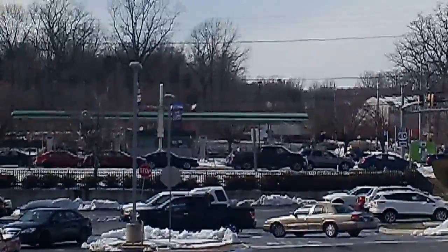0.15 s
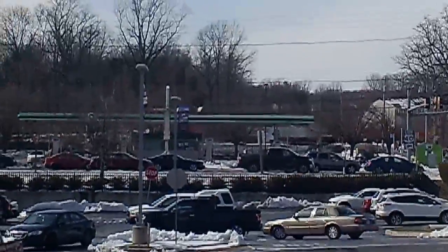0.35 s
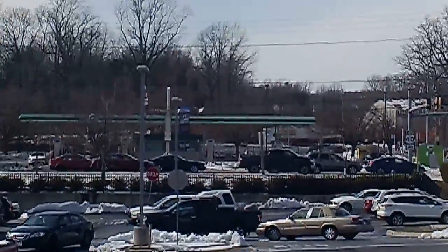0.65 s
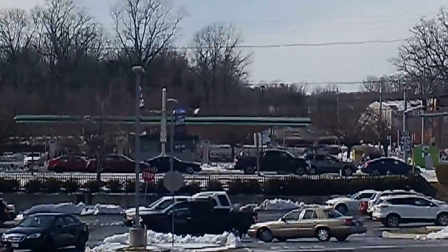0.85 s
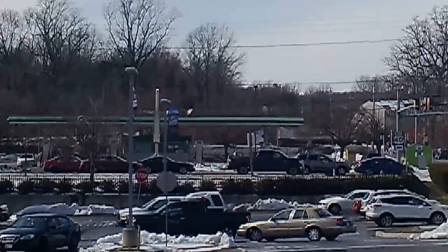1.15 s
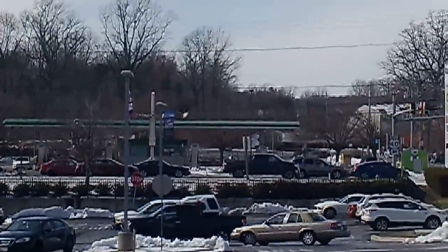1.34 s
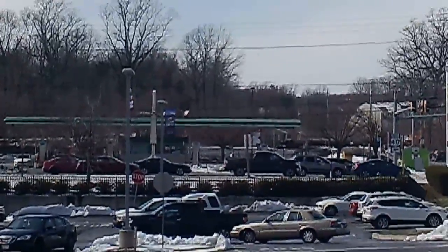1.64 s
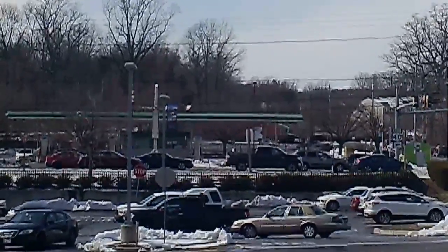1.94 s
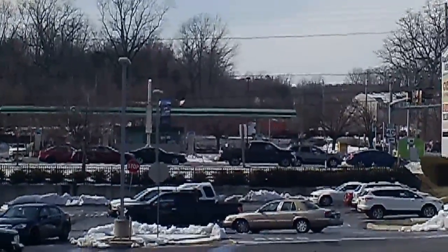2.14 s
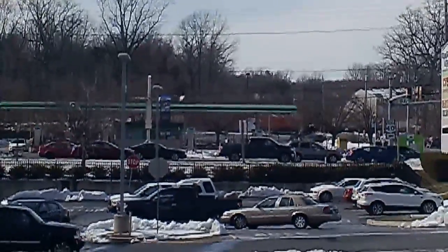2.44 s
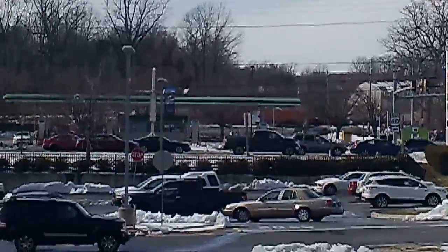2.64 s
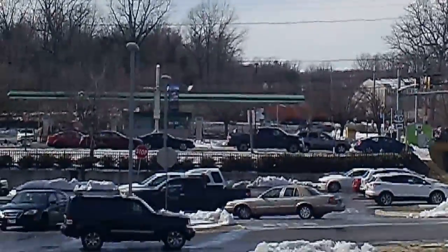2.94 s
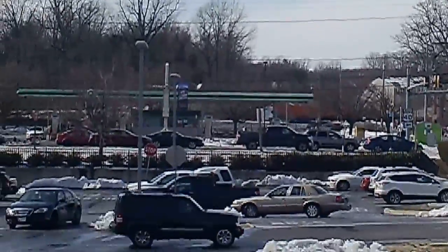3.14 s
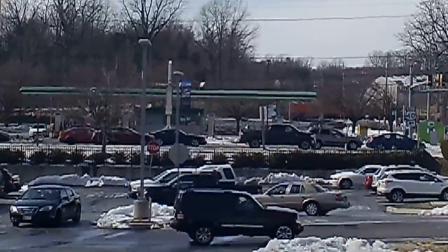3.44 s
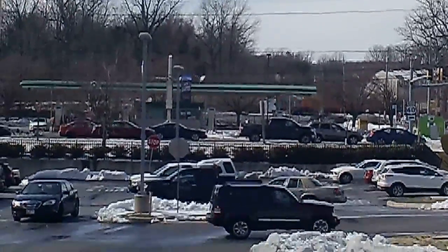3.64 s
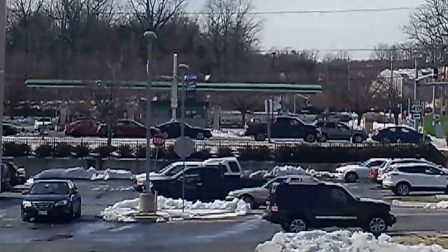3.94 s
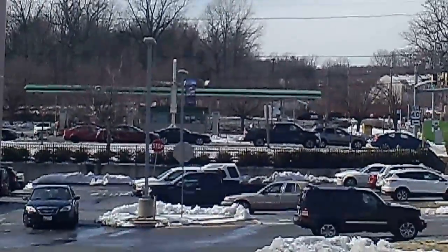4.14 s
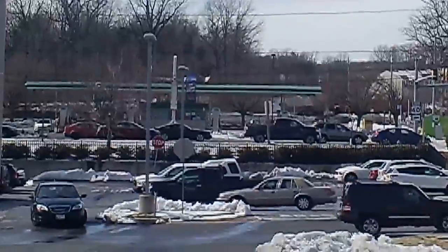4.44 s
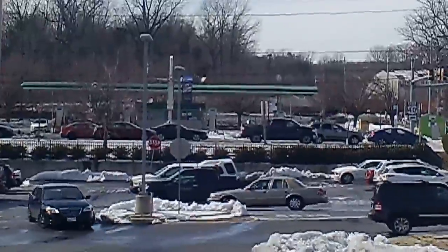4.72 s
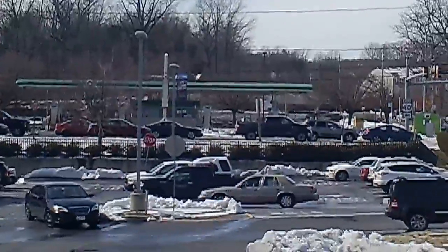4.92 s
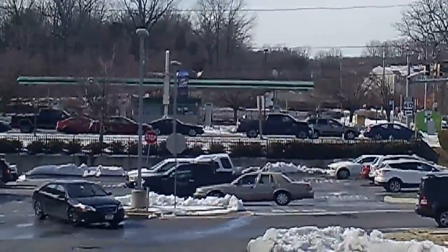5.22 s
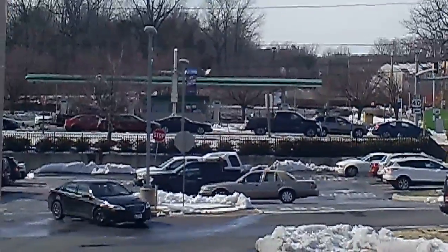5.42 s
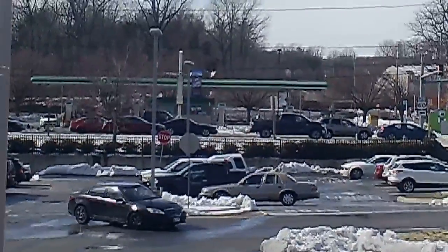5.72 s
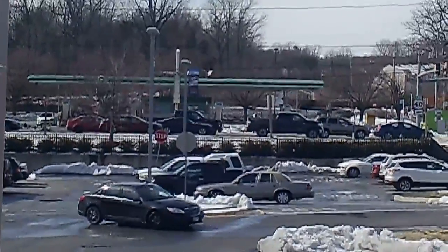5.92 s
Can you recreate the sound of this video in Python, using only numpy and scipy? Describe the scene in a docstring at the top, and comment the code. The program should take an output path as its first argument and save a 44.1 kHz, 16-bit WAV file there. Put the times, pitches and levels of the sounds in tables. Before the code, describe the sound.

An SUV rolls slowly past on wet asphalt, its tyres hissing and spattering over a droning engine and steady distant traffic.

```python
"""A wet car park: traffic rumbles, an SUV's engine drones closer and a far saloon passes at 0.8 s.
The SUV's treads pump air and roar; its tyres tear the water into hiss, mist and spatter, and grit
ticks from 1.8 s. It rolls slowly past at 3.4 s, while another engine revs up to 3.7 s and eases off.
From 5 s brakes squeak faintly and a second far saloon draws near as the SUV fades."""
import sys
import numpy as np
from scipy import signal
from scipy.fft import rfft, irfft, next_fast_len
from scipy.io import wavfile
from scipy.ndimage import uniform_filter1d

SR = 44100
rng = np.random.default_rng(int(sys.argv[2]) if len(sys.argv) > 2 else 0)


def output_pcm(signal):
    """Save a mono or channel-first signal as 16-bit PCM at the path in sys.argv[1].

    Samples are clipped to [-1, 1] before scaling.
    """
    pcm = np.clip(np.atleast_2d(signal).T, -1, 1) * 32767
    wavfile.write(sys.argv[1], SR, np.round(pcm).astype(np.int16))


N = 267741
TIME_S = np.arange(N) / SR


def undb(db):
    """Decibels to gain."""
    return 10 ** (np.asarray(db) / 20)


def unit(x):
    """Scale to rms 1."""
    return x / np.sqrt(np.mean(x ** 2))


def noise():
    """White noise."""
    return rng.standard_normal(N)


def walk(rate_hz):
    """Random steps, smoothed twice; rms 1."""
    hold = max(int(SR / rate_hz), 1)
    steps = noise()[np.arange(N) // hold]
    return unit(uniform_filter1d(uniform_filter1d(steps, hold), hold))


def bell(middle_s, width_s):
    """Gaussian hump of height 1."""
    return np.exp(-2 * ((TIME_S - middle_s) / width_s) ** 2)


def swell(middle_s, width_s, db):
    """Gain hump peaking at db."""
    return undb(db) * bell(middle_s, width_s)


def plateau(start_s, end_s, rise_s, fall_s):
    """Trapezoid, 1 from start to end."""
    return np.clip(np.minimum(1 + (TIME_S - start_s) / rise_s, 1 - (TIME_S - end_s) / fall_s), 0, 1)


def tone(hz, wander, rate_hz):
    """Sine with wavering pitch; rms 1."""
    pitch_hz = hz * (1 + wander * walk(rate_hz))
    return np.sqrt(2) * np.sin(2 * np.pi * np.cumsum(pitch_hz) / SR)


def colour(x, spectrum):
    """Filter by (frequency [Hz], level [dB]) points, rolling off outside them; rms 1."""
    hz, db = np.transpose(spectrum)
    size = next_fast_len(N)
    bins_hz = np.maximum(np.fft.rfftfreq(size, 1 / SR), 1)
    gain = undb(np.interp(np.log(bins_hz), np.log(hz), db))
    skirts = np.minimum(bins_hz / hz[0], 1) ** 2 * np.minimum(hz[-1] / bins_hz, 1) ** 4
    return unit(irfft(rfft(x, size) * gain * skirts, size)[:N])


def resonate(x, hz, width_hz):
    """Resonator, run twice for steep sides; rms 1."""
    peak = signal.iirpeak(hz, hz / width_hz, fs=SR)
    return unit(signal.lfilter(*peak, signal.lfilter(*peak, x)))


def band(x, hz, width_hz):
    """Band-pass with a steady or moving centre; rms 1."""
    bins_hz, frame_s, frames = signal.stft(x, SR, nperseg=512)
    centre_hz = np.interp(frame_s, TIME_S, np.full(N, hz))
    detune = (bins_hz[:, None] - centre_hz) / width_hz
    return unit(signal.istft(frames / (1 + 2 * detune ** 2), SR)[1][:N])


def drops(per_s, spread_db, smooth):
    """Droplet impacts, many small and a few large, over smooth noise; rms 1."""
    hits = rng.random(N) < per_s / SR
    sizes = undb(spread_db * np.minimum(rng.exponential(size=N), 5))
    impacts = unit(hits * sizes * np.sign(noise()))
    return unit(impacts + smooth * noise())


# road spectrum: (frequency [Hz], level [dB])
TRAFFIC_SPECTRUM = [(20, -23), (50, 1.5), (130, 3), (250, -14), (400, -26), (800, -19), (1350, 8.5),
                    (2100, -15), (3200, 2), (5000, -63), (15000, -51)]
def traffic():
    """The main road beyond the car park, nearly steady."""
    return colour(noise(), TRAFFIC_SPECTRUM) * undb(-42 + 0.15 * walk(1.4))


# drivetrain tones: (middle [s], width [s], frequency [Hz], level [dB])
HUM_TONES = [(0.397, 0.23, 222.3, -43.5), (1.1, 2.2, 115.1, -46.5), (0.456, 0.83, 558, -50),
             (.45, 0.63, 474, -50), (0.91, 2.4, 312.5, -47), (1.8, .9, 220, -47), (3.277, 0.13, 656, -38.5),
             (4.7, 7.8, 526, -54)]
def hums():
    """Other engines and drivetrains swell out of the traffic and sink back."""
    return sum(swell(s, width_s, db) * tone(hz, wander=0.00647, rate_hz=24.7)
               for s, width_s, hz, db in HUM_TONES)


# engine bay spectrum: (frequency [Hz], level [dB])
CLATTER_SPECTRUM = [(600, -3), (1500, 6), (2600, -16), (4000, -26.5), (8000, -40)]
def engine(firing_hz, orders, wander, flutter_db, clatter_db):
    """A muffled exhaust passes the low orders, half orders from unequal banks; each firing clatters."""
    firings = np.cumsum(firing_hz * (1 + wander * walk(12))) / SR
    exhaust = 0
    for order, db in orders:
        gain = undb(db + flutter_db * walk(11))
        exhaust += gain * np.sin(2 * np.pi * (order * firings + rng.random()))
    pulses = np.exp(-(firings % 1) / 0.42)
    clatter = colour(noise() * pulses, CLATTER_SPECTRUM)
    return np.sqrt(2) * exhaust + undb(clatter_db) * clatter


# exhaust orders: (multiple of firing rate [1], level [dB])
SUV_ORDERS = [(.5, -22), (1, -0.5), (1.5, -5.5), (2, -9), (3, -25)]
# engine course: (time [s], firing rate [Hz], gain [dB])
SUV_COURSE = [(0.25, 76.1, -51), (0.43, 76.1, -47), (0.57, 76.0, -46), (0.86, 77.25, -54),
              (1.06, 77.2, -48), (1.81, 77.6, -39), (2.03, 78.9, -39.5), (2.37, 78.6, -32),
              (2.96, 79.1, -34), (3.2, 77.66, -31.5), (4.63, 77.4, -41), (4.84, 78.6, -41.5),
              (6.07, 78.6, -49.5)]
def suv_engine():
    """Near-steady revs, swelling and fading as the SUV goes by."""
    s, hz, db = np.transpose(SUV_COURSE)
    note = engine(np.interp(TIME_S, s, hz), SUV_ORDERS, wander=0.0042, flutter_db=1.06, clatter_db=-6)
    return note * undb(np.interp(TIME_S, s, db))


def saloon_roar():
    """From further off, mostly the middle of the tread roar carries."""
    return band(noise(), hz=1023, width_hz=280) * undb(-41.5 + 0.53 * walk(7.7))


ABREAST_S, SPEED_M_S, CLOSEST_M = 3.366, 8.4, 10.4
FALL_DB_PER_DOUBLING = 15  # steep: parked cars and snow banks screen the SUV
def suv_pass(ahead_db, side_db, behind_db):
    """Pass-by gain: tyres beam along the road, weakest side-on, and fade with range."""
    along_m = SPEED_M_S * (TIME_S - ABREAST_S)
    range_m = np.hypot(along_m, CLOSEST_M)
    cosine = along_m / range_m
    lobe = np.where(cosine < 0, undb(ahead_db), undb(behind_db))
    beam = np.hypot(undb(side_db), cosine * lobe)
    return beam * undb(-FALL_DB_PER_DOUBLING * np.log2(range_m / CLOSEST_M))


# far cars: (nearest [s], width [s], tread [dB], hiss [dB], spray [dB], rumble [dB], carcass [dB])
SALOON_PASSES = [(.8, 2.7, -36, -36, -58, -40, -47), (5.703, 2.2, -38, -59, -61.5, -48.5, -52)]
def all_cars(part, ahead_db, side_db, behind_db):
    """Gain of one part of the rolling noise: SUV and saloons add in power."""
    column = ["tread", "hiss", "spray", "rumble", "carcass"].index(part)
    saloon_power = sum(swell(s, width_s, db[column]) ** 2 for s, width_s, *db in SALOON_PASSES)
    return np.sqrt(suv_pass(ahead_db, side_db, behind_db) ** 2 + saloon_power)


# body and carcass spectra: (frequency [Hz], level [dB])
RUMBLE_SPECTRUM = [(20, -24), (40, -20), (70, -12), (110, -5), (180, -1.5), (230, 2.5), (310, -2.5),
                   (390, -10), (550, -34)]
CARCASS_SPECTRUM = [(250, -4), (400, -6), (500, -1.5), (670, -1), (820, -2.5), (1100, -15.5), (1600, -35)]
def road_noise():
    """Rough asphalt shakes the car bodies and tyre carcasses."""
    rumble = colour(noise(), RUMBLE_SPECTRUM) * undb(0.9 * walk(4.46))
    carcass = colour(noise(), CARCASS_SPECTRUM) * undb(0.92 * walk(9))
    return (rumble * all_cars("rumble", ahead_db=-32, side_db=-37.5, behind_db=-36)
            + carcass * all_cars("carcass", ahead_db=-27.5, side_db=-43, behind_db=-30))


# puddles: (deepest from [s], until [s], deepening [s], draining [s], depth [0-1])
MELTWATER = [(2.7, 3.34, 4.5, .22, 0.96), (4.1, 4.45, 0.25, 1, 0.56)]
def water_db(full_depth_db):
    """Level change with the depth of meltwater under the SUV."""
    return full_depth_db * sum(depth * plateau(*timing_s) for *timing_s, depth in MELTWATER)


# sloshes: (middle [s], width [s], boost [dB])
SURGES = [(1.92, 0.11, 2), (2.288, 0.067, 3), (2.796, 0.09, 2), (3.355, 0.022, 7.5)]
def slosh_db():
    """Brief surges as a wheel runs through deeper water."""
    return sum(db * bell(s, width_s) for s, width_s, db in SURGES)


# wet tyre spectra: (frequency [Hz], level [dB])
TREAD_SPECTRUM = [(550, -22.5), (800, -12), (1000, -6), (1150, -3), (1330, 2), (1600, 1), (1850, -1.5),
                  (2100, 0), (2400, -7), (3000, -14.5), (4000, -39), (6000, -49)]
HISS_SPECTRUM = [(1500, -3.5), (2100, 1.5), (2450, -0.5), (2650, 0), (2950, 0), (3250, -4), (3600, -11),
                 (4000, -17), (4500, -22.5), (5200, -29.5), (7000, -41), (9000, -55)]
SPRAY_SPECTRUM = [(3000, -5), (5000, 1), (7000, -7), (9000, 4), (10800, 3.5), (12000, -1), (13500, -4),
                  (15600, -13), (18000, -25)]
def tyres():
    """Tread blocks pump air in the horn between tyre and road; the water film hisses and sprays."""
    wet_patches = walk(30.26)
    tread = colour(noise(), TREAD_SPECTRUM) * undb(0.51 * walk(18))
    hiss = colour(drops(per_s=5000, spread_db=2.2, smooth=0.77), HISS_SPECTRUM)
    hiss *= undb(water_db(5) + slosh_db() + 1.02 * wet_patches)
    spray = colour(drops(per_s=2500, spread_db=2.2, smooth=1), SPRAY_SPECTRUM)
    spray *= undb(water_db(-1) + 0.5 * slosh_db() + 0.39 * wet_patches)
    return (tread * all_cars("tread", ahead_db=-14.5, side_db=-25.5, behind_db=-18.5)
            + hiss * all_cars("hiss", ahead_db=-18, side_db=-33.5, behind_db=-24)
            + spray * all_cars("spray", ahead_db=-37.5, side_db=-58.5, behind_db=-55))


# puffs: (middle [s], width [s], level [dB])
MIST_PUFFS = [(1.2, 0.79, -55), (1.88, 0.22, -51.5), (4.1, 0.44, -60.5)]
def mist():
    """Wheels tear thin films of water into puffs of very high hiss."""
    hiss = band(drops(per_s=2500, spread_db=2.2, smooth=0.91), hz=11200, width_hz=2300)
    puffs = sum(swell(*puff) for puff in MIST_PUFFS)
    return hiss * puffs * undb(1.4 * walk(70))


# horn resonances: (middle [s], width [s], frequency [Hz], bandwidth [Hz], level [dB])
HORN_RINGS = [(1.545, 0.47, 1318, 80, -30), (1.99, 0.38, 2080, 170, -29), (2.447, 0.45, 1580, 280, -31),
              (2.715, 0.11, 3035, 169, -25.5), (2.98, 0.38, 3680, 419.7, -34),
              (3.118, .25, 2440, 260, -28.5), (4.36, 0.59, 1150, 428, -30), (4.45, 0.5, 2119, 1140, -36)]
def swishes():
    """The gap between tread and wet road rings at one resonance after another."""
    rings = sum(swell(s, width_s, db) * resonate(noise(), hz, width_hz)
                for s, width_s, hz, width_hz, db in HORN_RINGS)
    return rings * undb(0.5 * walk(40.2))


# drop spectrum: (frequency [Hz], level [dB])
SPATTER_SPECTRUM = [(1500, -31), (2600, -4), (3700, 3), (4100, -4.5), (4500, -5), (5100, -4.5),
                    (5700, -12.5), (7200, -13), (9000, -22), (10500, -53), (15000, -46)]
def spatter():
    """Close by, single drops fly off the SUV's wheels in uneven bursts."""
    bursts = undb(water_db(15) + 1.2 * walk(70) + 0.5 * slosh_db())
    patter = colour(drops(per_s=1500, spread_db=2.5, smooth=0.56), SPATTER_SPECTRUM)
    return patter * bursts * suv_pass(ahead_db=-42.5, side_db=-54.5, behind_db=-57)


SIZZLE_AHEAD_HZ, SIZZLE_SIDE_HZ, GLIDE_AT_S, GLIDE_TAU_S = 11000, 8950, 2.4, 0.093
def sizzle():
    """The finest droplets sizzle in a high band that drops in pitch as the wheels near."""
    ahead = 1 / (1 + np.exp((TIME_S - GLIDE_AT_S) / GLIDE_TAU_S))
    hz = SIZZLE_SIDE_HZ + (SIZZLE_AHEAD_HZ - SIZZLE_SIDE_HZ) * ahead
    bursts = undb(water_db(14.5) + 2.8 * walk(87))
    droplets = band(drops(per_s=2500, spread_db=3.9, smooth=1), hz, width_hz=2000)
    return droplets * bursts * suv_pass(ahead_db=-54.5, side_db=-66.5, behind_db=-71)


# grains: (time [s], level [dB], ring [Hz])
GRIT_SNAPS = [(1.844, -34, 10720), (1.849, -31, 4830), (2.275, -43, 11100), (2.807, -45, 13500),
              (2.948, -28, 3700), (3.344, -36, 3700), (3.424, -44, 9200), (5.727, -57, 10500)]
def grit(decay_s=0.011):
    """Each grain snaps out from under the tread with a short, broad ring."""
    out = np.zeros(N)
    decay = np.exp(-TIME_S[:SR // 10] / decay_s)
    for s, db, hz in GRIT_SNAPS:
        ring = resonate(rng.standard_normal(len(decay)), hz, width_hz=0.37 * hz)
        snap = undb(db) * ring * decay
        start = int(s * SR)
        out[start:start + len(snap)] += snap[:N - start]
    return out


REV_LOW_HZ, REV_TOP_HZ, BOOM_HZ, BOOM_WIDTH_HZ = 97.95, 140.2, 123.2, 16.3
# exhaust orders: (multiple of firing rate [1], level [dB])
REVVING_ORDERS = [(1, 1.5), (2, -7.5), (4, -13.5), (5, -14)]
def revving_engine():
    """Revs rise and fall once, booming where the firing rate meets the exhaust's resonance."""
    firing_hz = REV_LOW_HZ + (REV_TOP_HZ - REV_LOW_HZ) * bell(middle_s=3.68, width_s=1.36)
    boom = 1 / np.hypot(1, 2 * (firing_hz - BOOM_HZ) / BOOM_WIDTH_HZ)
    gain = undb(-34) * plateau(start_s=4, end_s=4.75, rise_s=3.7, fall_s=0.25)
    return engine(firing_hz, REVVING_ORDERS, wander=0.00672, flutter_db=0.9, clatter_db=-11) * boom * gain


# squeaks: (middle [s], width [s], level [dB])
BRAKE_SQUEAKS = [(5.046, 0.049, -66), (5.263, 0.057, -67), (5.91, .06, -73)]
def brakes():
    """A pad grazes its disc and sings thinly."""
    return sum(swell(*squeak) for squeak in BRAKE_SQUEAKS) * tone(hz=12000, wander=0.004, rate_hz=300)


def scene():
    """Mono mix at the edge of the car park."""
    wheels = tyres() + spatter() + mist() + swishes() + sizzle() + road_noise() + grit() + brakes()
    return (wheels + saloon_roar() + suv_engine() + revving_engine() + traffic() + hums())[None]


# microphone dips: (frequency [Hz], width [Hz])
MIC_NOTCHES = [(6010, 1550), (8010, 1700)]
CUTOFF_HZ = 15700
def record(dry):
    """The microphone has two treble dips and a steep top cut."""
    for hz, width_hz in MIC_NOTCHES:
        dry = signal.lfilter(*signal.iirnotch(hz, hz / width_hz, fs=SR), dry)
    return signal.sosfilt(signal.ellip(12, 0.1, 90, CUTOFF_HZ, fs=SR, output="sos"), dry)


dry = scene()
out = record(dry)
output_pcm(out)
```